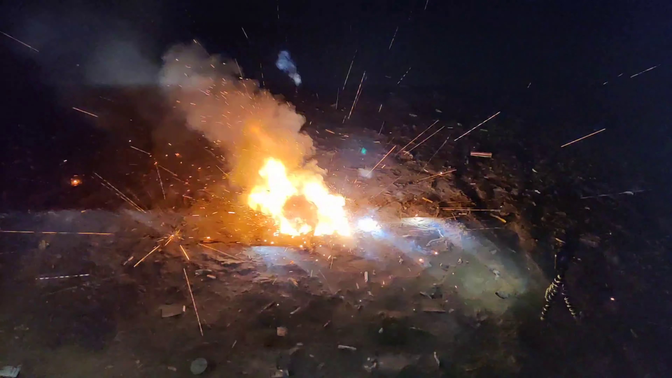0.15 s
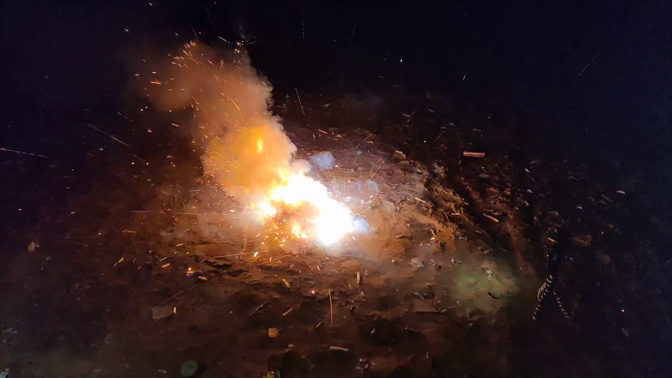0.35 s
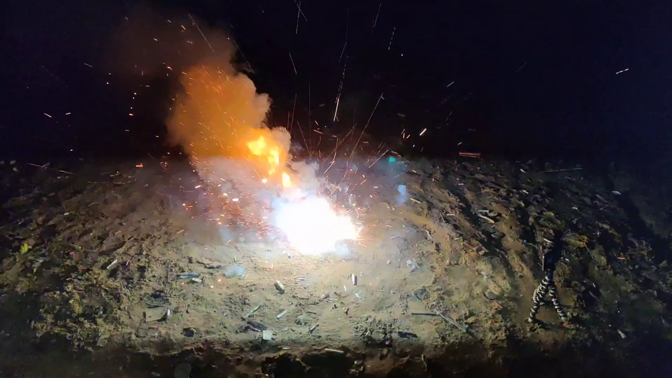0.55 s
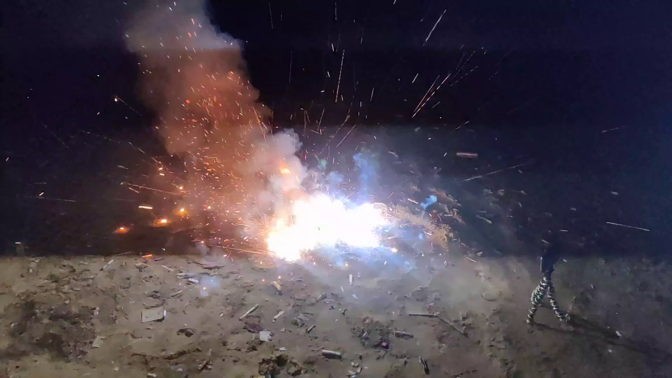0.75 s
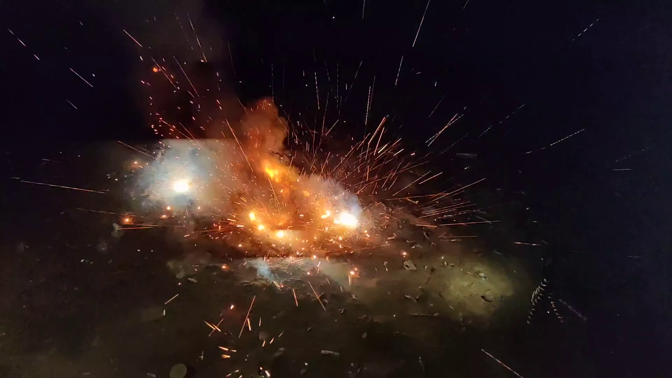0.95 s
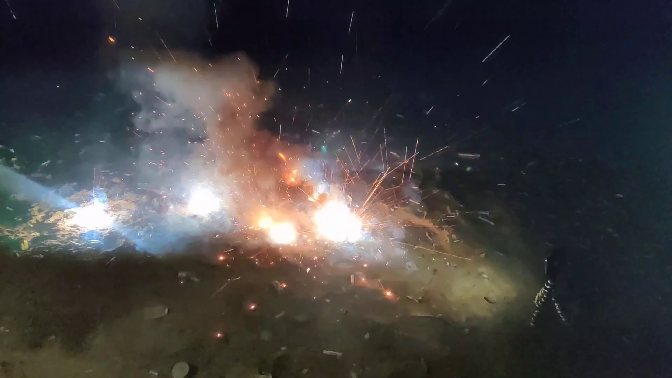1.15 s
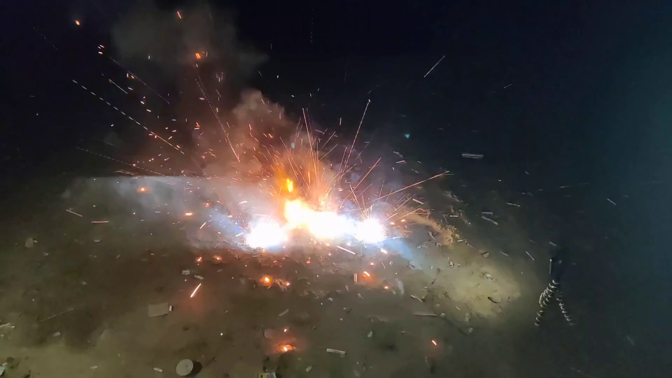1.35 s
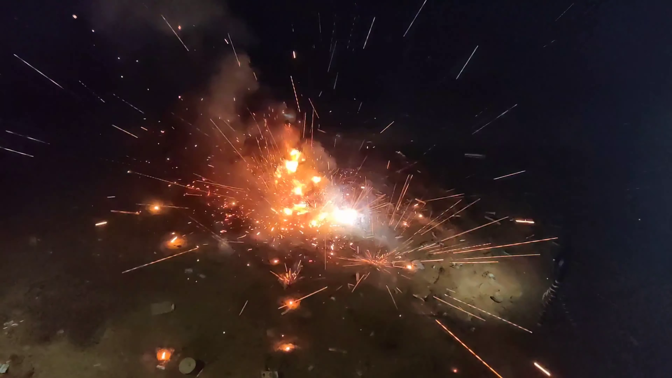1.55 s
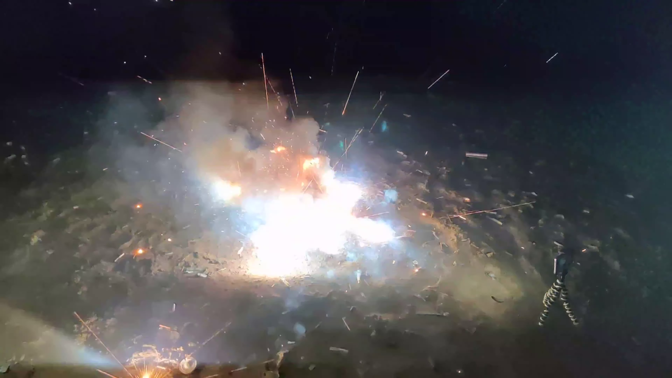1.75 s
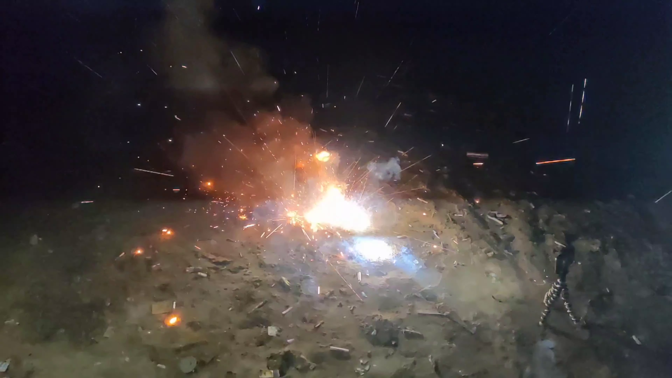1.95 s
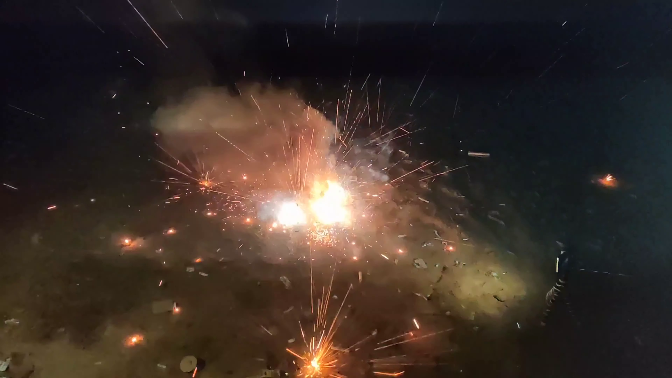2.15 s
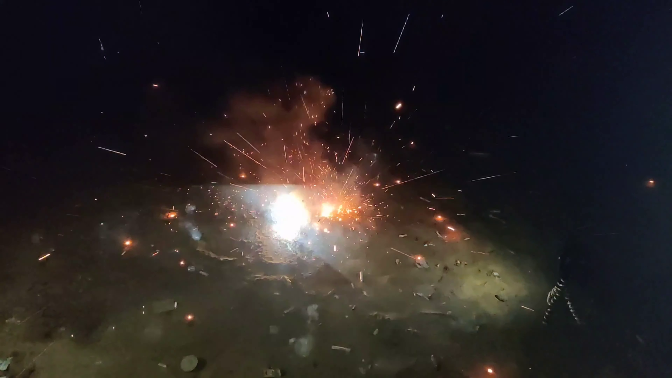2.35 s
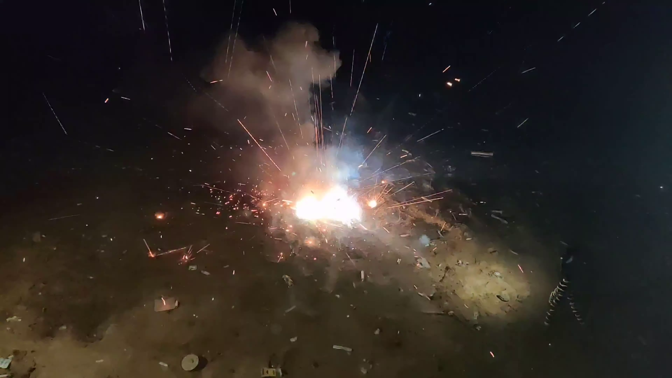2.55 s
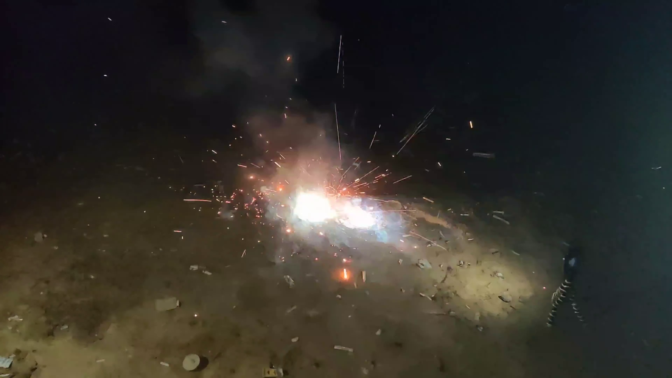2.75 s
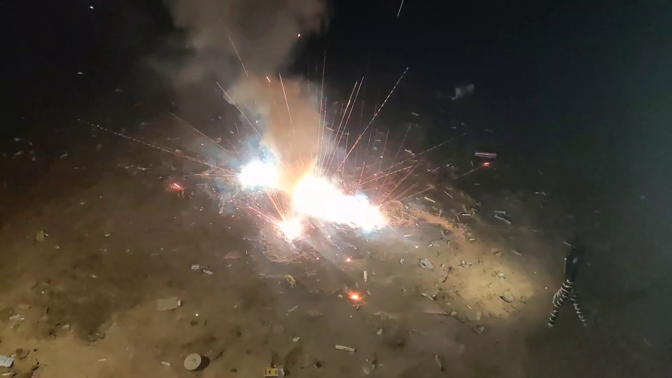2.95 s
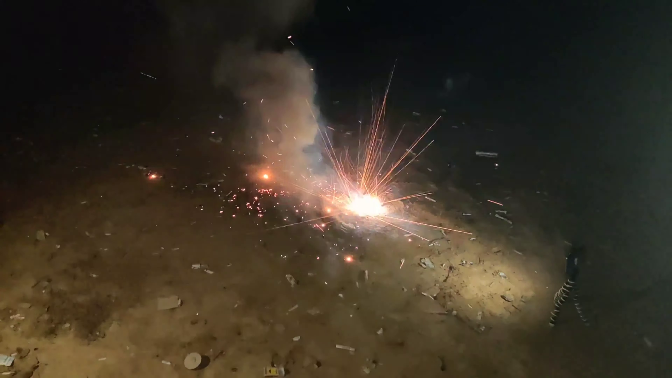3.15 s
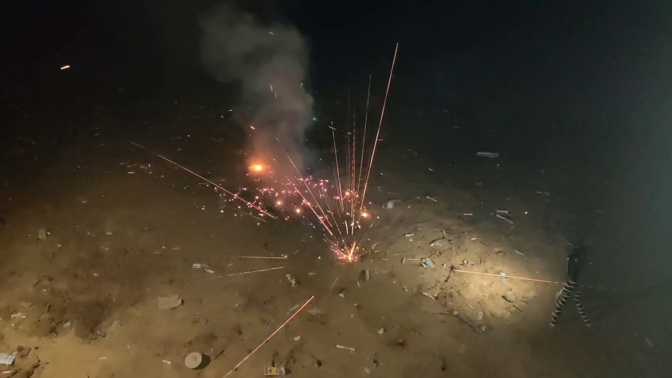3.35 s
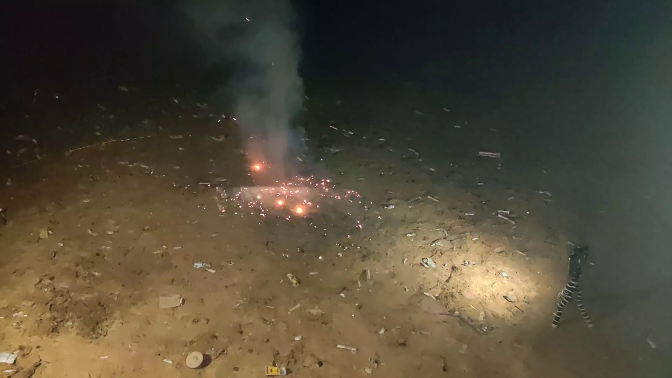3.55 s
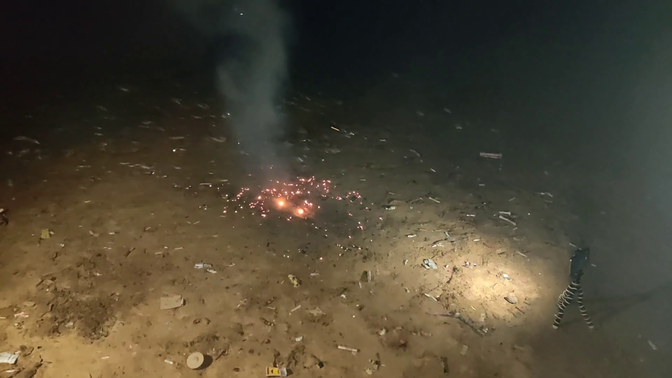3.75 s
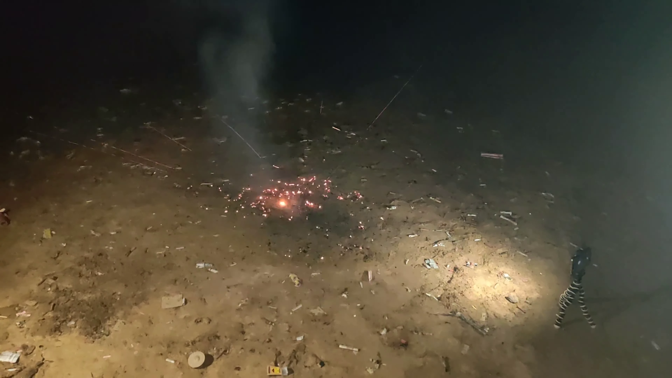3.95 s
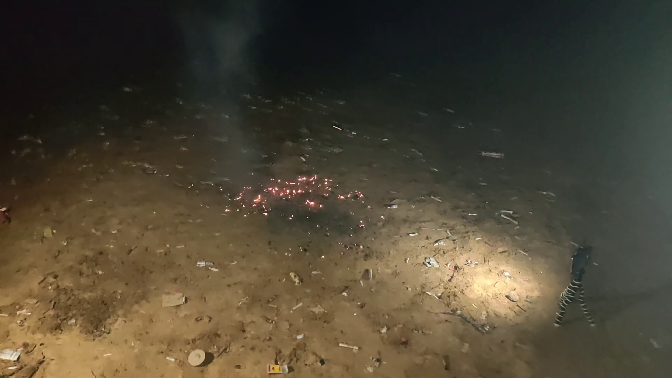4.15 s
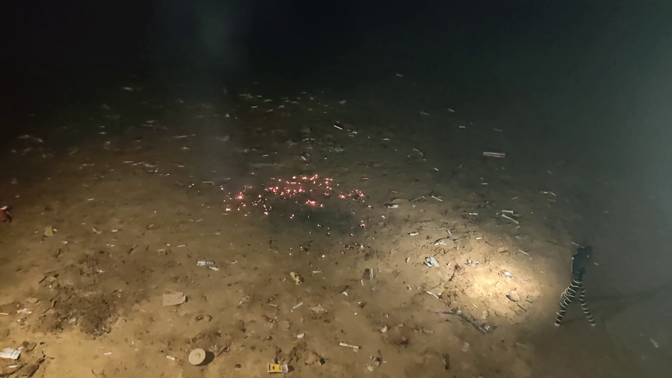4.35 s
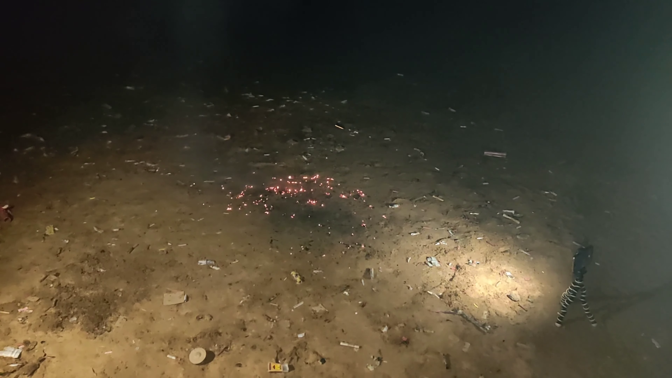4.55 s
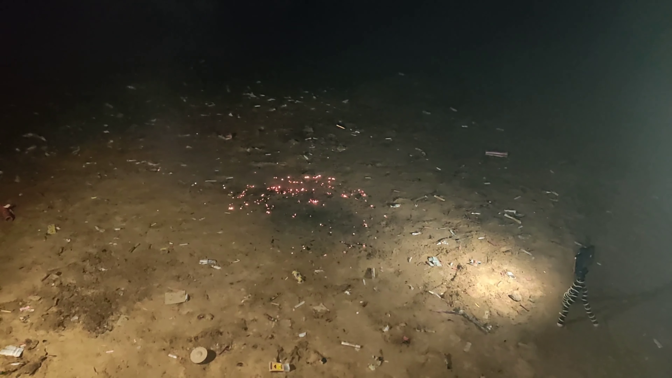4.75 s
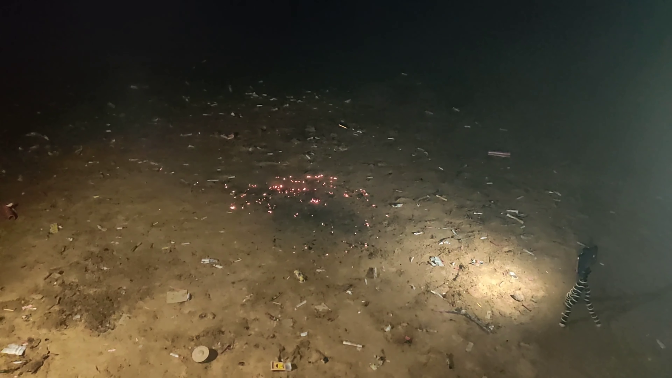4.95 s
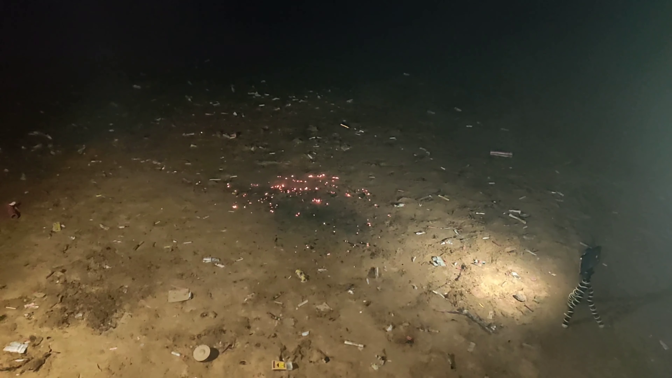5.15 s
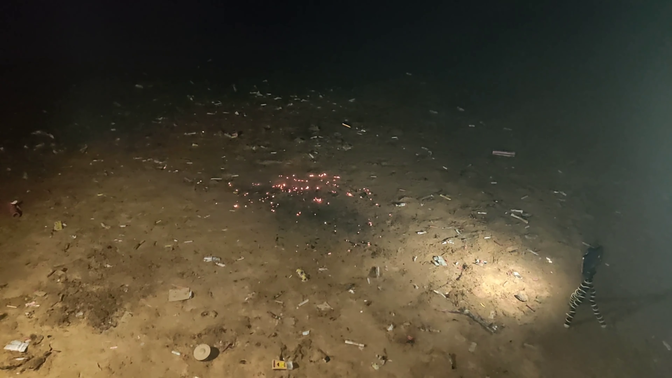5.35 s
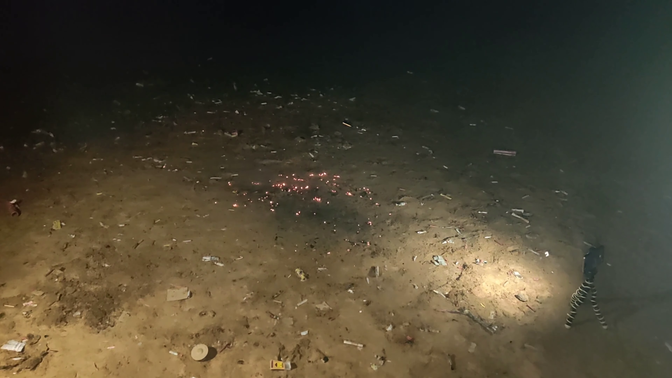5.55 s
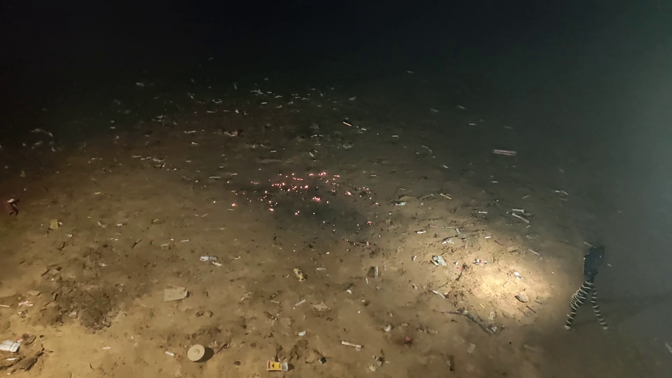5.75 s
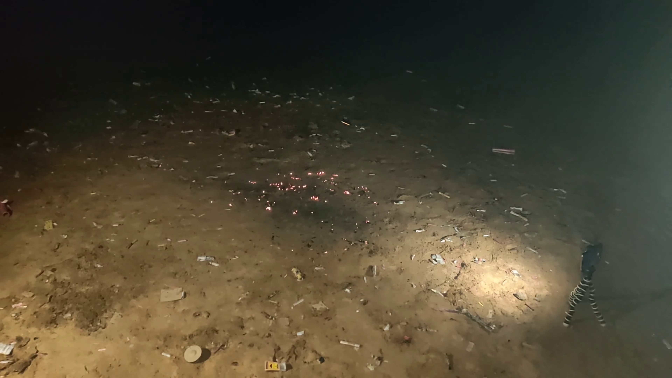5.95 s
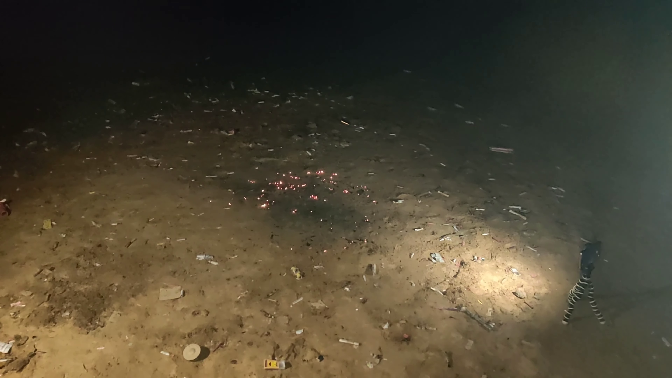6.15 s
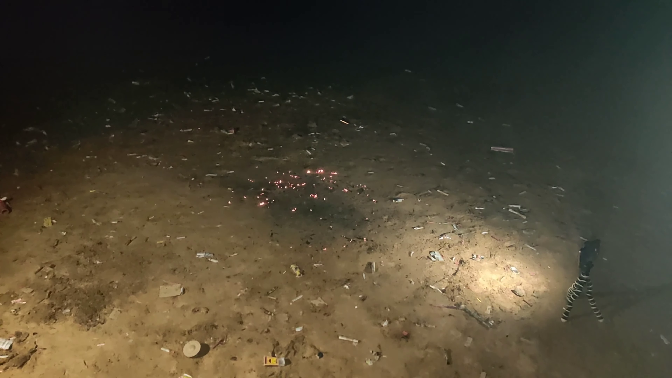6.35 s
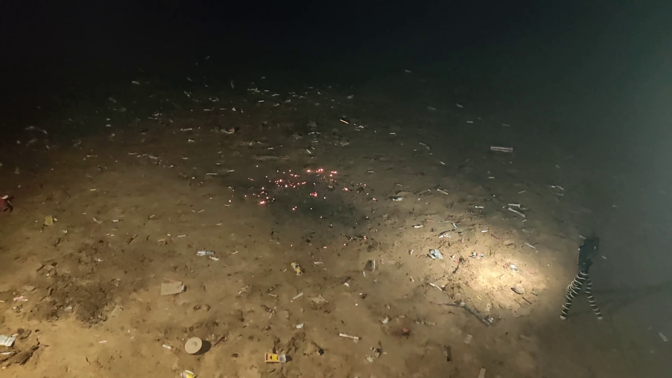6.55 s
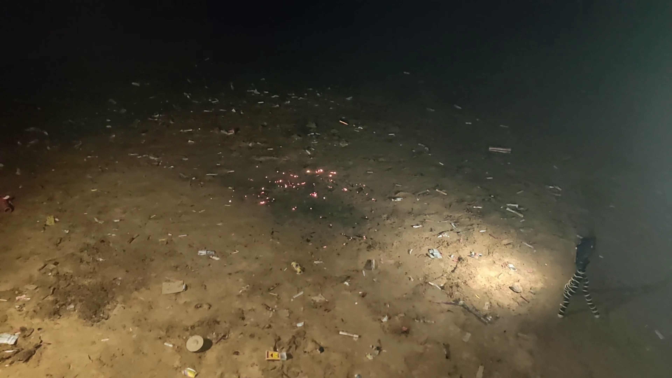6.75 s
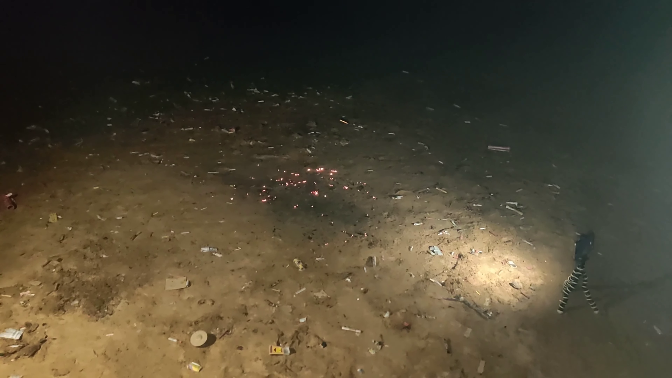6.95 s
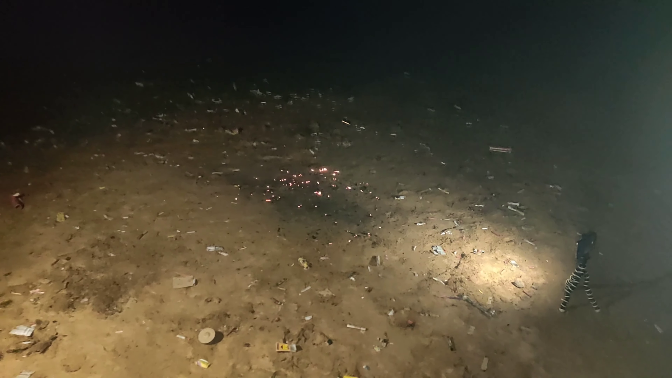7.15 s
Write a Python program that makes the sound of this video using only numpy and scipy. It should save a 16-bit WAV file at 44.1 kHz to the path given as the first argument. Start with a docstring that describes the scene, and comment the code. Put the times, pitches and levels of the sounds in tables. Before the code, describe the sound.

A string of small firecrackers is already going off at full force on open ground at night, a dense harsh rattle with ragged stutters and echoes. Sharper pops cluster, thin out and end in a few separate bangs. Then it is nearly quiet: wind rumbling on the microphone, faint hiss and small ember crackles. The close phone microphone overloads, the right side squeezed and broken up.

```python
"""A string of small firecrackers rattles off on open ground at night and ends in a few single pops, with echoes.
Each cracker is a shock with ragged after-shocks; echoes and a scattered tail of shaped noise follow it.
Wind, far hiss, insects and a few crackles of embers, all made of filtered noise, remain afterwards.
The two microphones of a phone pick it up: each port rings near 5 kHz; the right capsule is overloaded,
so its rest point jumps between the rails and squeezes the pops."""
import sys
import numpy as np
from scipy import signal
from scipy.fft import rfft, irfft, next_fast_len
from scipy.io import wavfile
from scipy.ndimage import uniform_filter1d, map_coordinates

SR = 44100
rng = np.random.default_rng(int(sys.argv[2]) if len(sys.argv) > 2 else 0)


def materialize(psi):
    """Save the field psi as 16-bit PCM at rate SR to the path in sys.argv[1].

    A 1-D psi becomes a single channel; in a 2-D psi each row is a channel.
    """
    bounded = np.clip(np.atleast_2d(psi).T, -1, 1)
    quanta = np.round(bounded * 32767).astype(np.int16)
    wavfile.write(sys.argv[1], SR, quanta)


N = 317079


def amp(db):
    """Amplitude factor of a level in dB."""
    return 10 ** (np.asarray(db) / 20)


def unit(x):
    """Scale each channel to rms 1."""
    return x / np.sqrt(np.mean(x ** 2, axis=-1, keepdims=True) + 1e-20)


def along(points, hz):
    """Read a curve of (Hz, value) points on a log frequency axis."""
    f, v = np.transpose(points)
    return np.interp(np.log(hz + 1), np.log(f + 1), v)


def level_curve(rows):
    """Level in dB at every sample from (s, dB) rows."""
    s, db = np.transpose(rows)
    return np.interp(np.arange(N) / SR, s, db)


def wobble(rate):
    """Two smooth random curves, rate knots a second."""
    knots = rng.standard_normal((2, int(N * rate / SR) + 4))
    position = np.arange(N) * rate / SR
    return np.array([map_coordinates(k, [position]) for k in knots])


def filtered(x, response):
    """Filter x by a complex response of frequency."""
    m = next_fast_len(N + SR // 2)
    hz = np.fft.rfftfreq(m, 1 / SR)
    return irfft(rfft(x, m) * response(hz), m)[..., :N]


def noise(spectrum):
    """Unrelated coloured noise of rms 1 in both channels, from (Hz, dB per Hz) points."""
    white = rng.standard_normal((2, N))
    return unit(filtered(white, lambda hz: amp(along(spectrum, hz))))


def causal(spectrum, size=2048):
    """The shortest (minimum-phase) pulse with this spectrum and peak 1."""
    hz = np.fft.rfftfreq(size, 1 / SR)
    cepstrum = irfft(np.log(amp(along(spectrum, hz))))
    cepstrum[1:size // 2] *= 2
    cepstrum[size // 2 + 1:] = 0
    pulse = irfft(np.exp(rfft(cepstrum)))
    return pulse / np.abs(pulse).max()


def night():
    """A far hiss, its level flickering, over a lower wash; both follow one level curve."""
    # common course of hiss and wash: time_s, relative level_db
    course = [(3.94, -59), (3.98, -64), (4.15, -69), (4.22, -77.5), (4.3, -69), (4.55, -71.5), (5.0, -59),
              (5.7, -68.5), (7.19, -73)]
    # far hiss: frequency_hz, density_db_per_hz
    hiss = [(1200, -31), (2000, 4), (3500, -1), (6500, -7.5), (7500, -6), (15000, -24)]
    # lower wash: frequency_hz, density_db_per_hz
    wash = [(150, 6), (400, -3), (900, -4.5), (1500, -11.5), (2500, -12.5), (4000, -41.5)]
    flicker = amp(1.2 * wobble(25))
    both = amp(-6.5) * flicker * noise(hiss) + amp(5.0) * noise(wash)
    return amp(level_curve(course)) * both


def insects():
    """A faint, fuzzy, broken trill far off: a narrow noise band of uneven level."""
    trill = noise([(3500, -60), (3700, 0), (3880, 0), (4080, -60)])
    return amp(-90 + 5 * wobble(9)) * trill


def wind():
    """Lumpy buffeting, different at each port, and sudden puffs on the right port alone."""
    # wind on both ports: time_s, level_db (left port)
    breeze = [(4.1, -64), (4.35, -52), (4.6, -38.5), (4.95, -36), (5.5, -38.5), (6.0, -38), (6.45, -45.5),
              (6.8, -42), (7.04, -45.5), (7.19, -42.5)]
    # rumble of the breeze: frequency_hz, density_db_per_hz
    buffet = [(8.8, -6.5), (15, 12.5), (59, 6.5), (129, -18), (374, -42), (413, -48.5), (450, -42.5),
              (580, -80.5), (990, -120)]
    # puffs: peak_s, peak level_db
    gusts = [(4.94, -20), (5.28, -34.5), (5.6, -46), (5.98, -41), (6.17, -44), (6.28, -45.5), (6.82, -44),
             (6.96, -41.5), (7.06, -38.5)]
    # rumble of a puff: frequency_hz, density_db_per_hz
    puff = [(10, 2.5), (30, 3.5), (100, 0.5), (200, -17), (400, -33.5), (600, -68), (990, -120)]
    rise_db_per_s, fall_db_per_s = 320, 215
    lumps = amp(2.5 * wobble(14))
    buffeting = amp(level_curve(breeze)) * unit(lumps * noise(buffet))
    t = np.arange(N) / SR
    puffs = np.zeros(N)
    for peak_s, db in gusts:
        drop_db = np.maximum(rise_db_per_s * (peak_s - t), fall_db_per_s * (t - peak_s))
        puffs += amp(db - drop_db)
    return amp([[0], [-4]]) * buffeting + puffs * noise(puff) * [[0], [1]]


def embers():
    """Small crackles, each a short burst of noise, and rustles of dry debris, each a swarm of grains."""
    # crackles of embers: start_s, relative level_db
    crackles = [(4.6204, -40), (5.0065, -36), (5.4755, -33.5), (5.4949, -18), (5.5077, -5), (5.5854, -42),
                (6.0277, -16), (6.047, -30), (6.2542, -34), (6.7101, -26), (6.9441, -25), (6.9687, -25)]
    # dry debris stirs: start_s, length_s, level_db before the filter
    rustles = [(4.574, 0.092, -63.5), (5.468, 0.069, -46), (5.531, 0.062, -56), (5.964, 0.058, -69),
               (6.014, 0.091, -56.5), (6.19, 0.08, -67), (6.763, 0.17, -63.5), (6.979, 0.041, -62.5)]
    out = np.zeros((2, N + SR))
    t = np.arange(400) / SR
    for s, db in crackles:
        burst = amp(db - 29 - 60 * t / 0.014) * rng.standard_normal(len(t))  # falls at 60 dB per 14 ms
        out[:, round(s * SR):][:, :len(t)] += burst
    swarm = amp(5 * wobble(300)[0])
    for s, length_s, db in rustles:
        start, n = round(s * SR), round(length_s * SR)
        grains = rng.standard_normal((2, n)) * swarm[start:][:n]
        out[:, start:][:, :n] += amp(db) * np.hanning(n) ** .6 * grains

    def debris(hz):
        """Thin, dull-topped sound; bits of paper tube ring briefly at 2.1 kHz."""
        high = (1j * hz / 1500 / (1 + 1j * hz / 1500)) ** 2
        knock = 1 + 1.5 * 1j * hz * 600 / (2100 ** 2 - hz ** 2 + 1j * hz * 600)
        return high * knock / (1 + 1j * hz / 6000) ** 2

    return filtered(out[:, :N], debris)


def shocks(times, gains, ragged, life):
    """Each cracker is a shock and ragged after-shocks, falling at 60 dB per life samples; its energy is gain squared."""
    step = np.arange(64)
    shape = ragged * rng.standard_normal((len(times), 64)) * amp(-60 * step / life)
    shape[:, 0] = 1
    shape /= np.linalg.norm(shape, axis=1, keepdims=True)
    weight = (gains[:, None] * shape).ravel()
    start = np.round(times * SR).astype(int)[:, None] + step
    # the left port hears most crackers a few samples late
    lag = np.round(3 + 1.8 * rng.standard_normal((len(times), 1))).astype(int)
    ports = [(start + delay).ravel().clip(0) for delay in (lag, 0)]
    return np.array([np.bincount(index, weight, N + SR)[:N] for index in ports])


def surroundings(times, gains, direct):
    """Single echoes, whose delay depends on where the cracker lay, then a scattered tail."""
    # single echoes: delay_s, level_db before the treble loss, scatter_s
    echoes = [(.004, -11.5, .0004), (.014, -30, .001), (.031, -13, .001), (.073, -35.5, 0.0022),
              (.157, -36.5, 0.0013), (.19, -35.5, 0.00087), (.255, -35.5, .001)]
    # decay of the scattered tail: frequency_hz, t60_s
    outdoors = [(300, 0.39), (2000, 0.22), (6000, 0.19), (14000, 0.017)]
    far_s, far_hz = .02, 7000  # echoes later than this come back duller, above this corner
    near, far = np.zeros((2, N)), np.zeros((2, N))
    for delay_s, db, scatter_s in echoes:
        arrival = times + delay_s + scatter_s * rng.standard_normal(len(times))
        echo = shocks(arrival, gains * amp(db), ragged=0.34, life=310)
        if delay_s > far_s:
            far += echo
        else:
            near += echo
    answer = near + filtered(far, lambda hz: 1 / (1 + 1j * hz / far_hz) ** 2)
    # two tails trade places, so the tail differs from moment to moment
    share = np.sin(np.pi * np.arange(N) / SR / .11) ** 2
    for part in (share, 1 - share):
        hz, t, z = signal.stft(rng.standard_normal((2, SR // 2)), SR, nperseg=256)
        decay = amp(-60 * t / along(outdoors, hz)[:, None])
        tail = signal.istft(z * decay, SR, nperseg=256)[1][:, :SR // 2]
        tail /= np.linalg.norm(tail[0])
        answer += amp(-19.5) * signal.fftconvolve(part * direct, tail, axes=1)[:, :N]
    return filtered(answer, lambda hz: 1 / (1 + 1j * hz / 7000))  # air and ground take the treble


def lesser():
    """A random mass of smaller, more ragged crackers that thins out and falters: times, sizes and sound."""
    # the string falters: middle_s, length_s
    lulls = [(0.004, 0.0047), (0.107, 0.023), (0.169, 0.012), (0.27, 0.01), (1.266, 0.013), (1.279, 0.022),
             (1.313, 0.018), (1.45, 0.025), (1.684, 0.036), (1.818, 0.013), (1.874, 0.012), (2.166, 0.0087),
             (2.251, 0.004), (2.326, 0.028), (2.405, 0.0096), (2.457, 0.017), (2.487, 0.023), (2.525, 0.01),
             (2.598, 0.0086), (2.634, 0.0062)]
    end_s, first_db, drift_db_per_s, lull_db = 2.659, -4.5, 2, -8
    thins_to = .4  # share of them still firing at the end
    progress, chance, survival = rng.random((3, 5200))
    firing = survival < 1 - (1 - thins_to) * progress
    s = progress[firing] * end_s
    spread_db = 12 * chance[firing]
    lull = sum(np.clip(2 - 4 * np.abs(s - mid) / length, 0, 1) for mid, length in lulls)
    gains = amp(first_db + drift_db_per_s * s + lull_db * lull - spread_db)
    return s, gains, shocks(s, gains, ragged=0.53, life=46.7)


def loudest():
    """The loudest crackers are clean, sharp shocks: times, sizes for the echoes, and sound."""
    # the loudest crackers: start_s, relative level_db
    pops = [(0.1187, 0.5), (0.1368, -1.5), (0.1635, -8.5), (0.235, -6.5), (0.2731, 2.4), (0.2988, -7.6),
            (0.5002, -5), (0.5643, 0), (0.6355, -5), (0.6433, 1.7), (0.6712, -2), (0.9377, -7.3),
            (1.0309, -3.5), (1.052, 0), (1.0641, 4), (1.1705, -2), (1.2814, 0.5), (1.4684, -1.5),
            (1.4754, -5), (1.4837, -1.5), (1.4955, -5.5), (1.508, -2.5), (1.631, 4.8), (1.6576, -4),
            (1.6683, -3.9), (1.6899, -2.3), (1.6993, -0.8), (1.7082, -0.1), (1.7838, -0.5), (1.8306, -1.5),
            (1.94, 1.5), (1.956, -0.5), (1.9987, -1), (2.0129, -1.5), (2.0213, -3.5), (2.0619, -5),
            (2.2403, -0.5), (2.4172, 5.6), (2.5392, 3), (2.605, 1), (2.6559, -3.5), (2.6717, -3),
            (2.6755, 3.5), (2.6939, -3.5), (2.7022, 1.1), (2.7109, -7.5), (2.715, -10), (2.718, 0),
            (2.719, -2.5), (2.7197, -7.5), (2.722, 0.5), (2.7241, -8.5), (2.7265, -9), (2.7536, -8.5),
            (2.759, -1.5), (2.7619, -2), (2.7641, -2.5), (2.771, -11), (2.7788, -3.5), (2.7826, -4.5),
            (2.794, -2.5), (2.7965, -8), (2.7981, -4), (2.8009, 1.5), (2.8161, -0.5), (2.8216, -8),
            (2.827, -0.5), (2.8291, -9), (2.838, 0.5), (2.8403, -2), (2.8693, -2.5), (2.8786, -2.0),
            (2.9074, -4.3), (2.9139, 0), (2.9169, -2.5), (2.9218, 2.5), (2.9245, -3.5), (2.9274, -3.9),
            (2.9335, -9), (2.9534, 2), (2.9554, -6.5), (2.9759, 0.1), (2.9827, -9.5), (2.9964, -8),
            (3.0203, -4.1), (3.031, -1), (3.0323, -4.5), (3.0429, -6), (3.0469, 0.5), (3.0528, -7.5),
            (3.0549, 3.5), (3.0638, -3.5), (3.0702, -2), (3.0787, -2.1), (3.0841, -4), (3.1315, -5.5),
            (3.134, -10.5), (3.1596, -10), (3.164, -8.5), (3.1725, -7), (3.1813, -9.5), (3.246, -0.5),
            (3.2592, -5), (3.3056, -7), (3.3281, 0.2), (3.3906, -4.4), (3.397, -5), (3.4427, -9.5),
            (3.5188, -6), (3.5427, -24.5), (3.5633, -2), (3.6795, -1.8), (3.9649, -10), (4.082, -3.5)]
    s, db = np.transpose(pops)
    return s, amp(db + 3.5), shocks(s, amp(db + 5), ragged=0.45, life=58)


def scene():
    """Crackers and their echoes, shaped by the blast pulse, over the sounds of the open ground."""
    # spectrum of one blast: frequency_hz, relative level_db
    blast = [(20, -21), (150, -4.5), (400, 2.5), (1000, -1.5), (2500, 2), (6000, -1), (9000, -9.5),
             (12000, -11.5), (16000, -5.5)]
    lesser_s, lesser_gains, mass = lesser()
    loud_s, loud_gains, loud = loudest()
    direct = loud + mass
    answer = surroundings(np.r_[loud_s, lesser_s], np.r_[loud_gains, lesser_gains], direct)
    bangs = signal.fftconvolve(direct + answer, causal(blast)[None], axes=1)[:, :N]
    return night() + insects() + wind() + embers() + bangs


def squeeze(x, top):
    """Soft saturation at +-top."""
    return x / (1 + (x / top) ** 4) ** (1 / 4)


def port_ringing(dry):
    """Each microphone port adds its own resonance to the open sound."""
    # left and right port: centre_hz, width_hz, gain_db of the added resonance
    ports = [(4950, 1000, 12), (4690, 450, 20)]

    def ring(hz):
        return np.array([1 + amp(db) * 1j * hz * width / (centre ** 2 - hz ** 2 + 1j * hz * width)
                         for centre, width, db in ports])

    return filtered(dry, ring)


def seize_up(port, open_air):
    """At times the right capsule seizes up, passes only strong pops and rings less."""
    # seized stretches: from_s, to_s
    deaf_spans = [(3.186, 3.327), (3.444, 3.54), (3.968, 4.24)]
    breakaway = .2  # pressure in full scale that half frees it
    loss_db, ring_share = 3, .4  # what a pop loses then, share of port ringing left
    t = np.arange(N) / SR
    seized = sum((a < t) & (t < b) for a, b in deaf_spans) * 1.
    deaf = uniform_filter1d(seized, size=200)
    force = uniform_filter1d(np.abs(port), size=20) ** 2
    freed = force / (force + breakaway ** 2)
    stiff = ring_share * port + (1 - ring_share) * amp(6.5) * open_air
    return (1 - deaf) * port + deaf * amp(-loss_db) * freed * stiff


def rest_point():
    """Each jump of the right capsule's rest point glides in; the coupling capacitor bleeds it away."""
    # the rest point is thrown off: start_s, step_full_scale, glide_s
    jumps = [(0.0, 0.8, 0.002), (0.01, -1.18, 0.002), (0.028, 0.91, 0.002), (0.05, -0.45, 0.002),
             (0.064, -0.65, 0.01), (0.125, 0.91, 0.002), (0.187, -1.05, 0.002), (0.197, 0.88, 0.002),
             (0.212, -0.34, 0.002), (0.262, -0.67, 0.002), (0.273, 0.63, 0.002), (0.285, 0.56, 0.002),
             (0.291, -0.66, 0.002), (0.3, 0.52, 0.002), (0.314, -0.82, 0.002), (0.354, 0.4, 0.002),
             (0.362, 0.63, 0.002), (0.39, -0.53, 0.002), (0.548, 0.45, 0.002), (0.558, -0.62, 0.002),
             (0.572, -0.38, 0.002), (0.589, 0.6, 0.002), (0.615, -0.53, 0.002), (0.634, 0.37, 0.002),
             (0.651, 0.78, 0.002), (0.656, -0.66, 0.01), (0.701, -0.43, 0.002), (0.714, 0.84, 0.002),
             (0.729, -0.39, 0.002), (0.829, -0.36, 0.002), (0.855, 0.36, 0.002), (0.88, -0.77, 0.002),
             (0.891, 1.28, 0.002), (0.916, -0.88, 0.002), (0.958, 0.93, 0.002), (0.967, -0.43, 0.002),
             (0.993, -0.5, 0.002), (1.013, 0.92, 0.01), (1.033, -0.83, 0.025), (1.091, 0.77, 0.002),
             (1.107, -0.5, 0.002), (1.178, 0.41, 0.002), (1.209, -0.5, 0.002), (1.234, -0.49, 0.002),
             (1.268, 0.58, 0.002), (1.298, 0.74, 0.002), (1.312, -0.66, 0.002), (1.326, -0.57, 0.002),
             (1.348, 0.46, 0.002), (1.356, 0.73, 0.002), (1.374, -0.58, 0.025), (1.43, -0.84, 0.01),
             (1.442, 0.71, 0.09), (1.539, 0.71, 0.002), (1.558, -0.72, 0.002), (1.577, -0.48, 0.002),
             (1.597, 0.34, 0.002), (1.632, 0.25, 0.002), (1.714, 0.53, 0.002), (1.739, -0.8, 0.002),
             (1.812, 1.05, 0.002), (1.83, -0.96, 0.002), (1.948, 0.68, 0.002), (1.998, -0.66, 0.002),
             (2.127, 0.76, 0.002), (2.162, -1.3, 0.002), (2.174, 0.71, 0.002), (2.225, 0.31, 0.002),
             (2.264, -0.76, 0.01), (2.313, 1.04, 0.002), (2.334, -1.42, 0.002), (2.341, 0.44, 0.002),
             (2.348, 0.85, 0.002), (2.356, -0.73, 0.01), (2.383, -0.32, 0.002), (2.446, 1.06, 0.01),
             (2.503, -0.68, 0.002), (2.521, -0.88, 0.002), (2.527, 0.72, 0.01), (2.557, 0.46, 0.002),
             (2.562, -0.35, 0.002), (2.61, 0.96, 0.002), (2.622, -0.49, 0.002), (2.645, -0.65, 0.002),
             (2.723, 1.08, 0.002), (2.76, -1.0, 0.002), (2.766, -0.5, 0.002), (2.779, 0.26, 0.002),
             (2.83, 0.4, 0.04), (2.879, 0.3, 0.002), (3.052, 0.2, 0.002), (3.07, -0.35, 0.08),
             (3.16, -0.53, 0.002), (3.226, 0.96, 0.025), (3.3285, -0.42, 0.002), (3.345, -0.2, 0.03),
             (3.386, 0.15, 0.004), (3.443, -0.32, 0.002), (3.519, 0.91, 0.002), (3.538, -0.35, 0.025),
             (3.589, -0.69, 0.05), (3.674, 0.22, 0.003), (3.7, -0.15, 0.1), (3.967, -0.5, 0.002),
             (4.036, 1.0, 0.025), (4.177, -0.88, 0.025), (4.269, 0.86, 0.09)]
    coupling_s = .09  # time constant of the creep back
    push = np.zeros(N)
    for s, step, glide_s in jumps:
        n = round(glide_s * SR)
        push[round(s * SR):][:n] += step / n
    return signal.lfilter([1], [1, 1 / (coupling_s * SR) - 1], push)


def overloaded_capsule(port, jolt):
    """The right capsule saturates around a wandering rest point; near a rail it has less room to swing."""
    rail, headroom = 0.47, 0.69  # full scale: swing when loaded, extra when centred and rested
    busy = .05  # load in full scale that halves the extra
    sense_db, rail_gain_db = 6.5, 0.5  # sensitivity, and what a rested capsule gains at the rail
    loudness = np.abs(port)
    shove = uniform_filter1d(loudness, size=400) * wobble(130)[1]  # loud ringing shoves it slowly
    rest = rest_point() + amp(-10) * shove
    load = uniform_filter1d(loudness, size=SR // 5)
    rested = 1 / (1 + (load / busy) ** 4)
    stuck = np.clip(np.abs(rest) / rail, 0, 1) ** 2
    swing = rail + headroom * rested * (1 - stuck)
    gain_db = sense_db + rail_gain_db * rested * stuck
    leak = squeeze(amp(gain_db - 35.5) * port, 0.58)  # a little ringing passes even at the rails
    jolted = port + amp(-9.5) * jolt
    return squeeze(amp(gain_db) * jolted + rest, swing) + leak


def record(dry):
    """Port resonances, saturation around each capsule's rest point, capsule hiss and band limit."""
    top_hz = 16000
    ports = port_ringing(dry)
    ports[1] = seize_up(ports[1], dry[1])
    slam = np.abs(ports) * wobble(300)  # loud ringing jolts both rest points about
    jolt = uniform_filter1d(slam, size=60)
    left = squeeze(ports[0] + amp(-30) * jolt[0], .9)
    right = overloaded_capsule(ports[1], jolt[1])
    both = np.array([left, right]).clip(-.85, .85)
    both = both + amp(-70.0) * rng.standard_normal((2, N))  # the capsules' own hiss
    return filtered(both, lambda hz: np.clip((top_hz - hz) / 250, 0, 1))


dry = scene()
out = record(dry)
materialize(out)
```